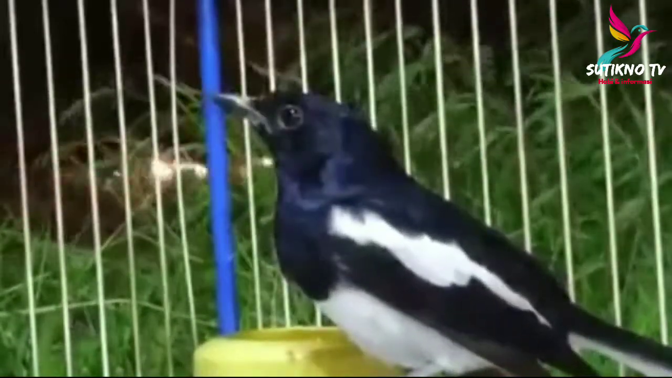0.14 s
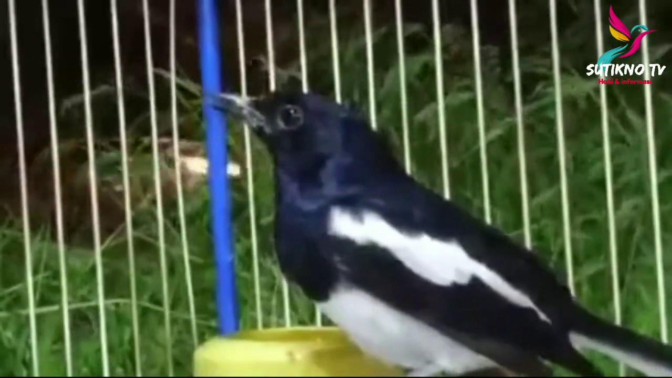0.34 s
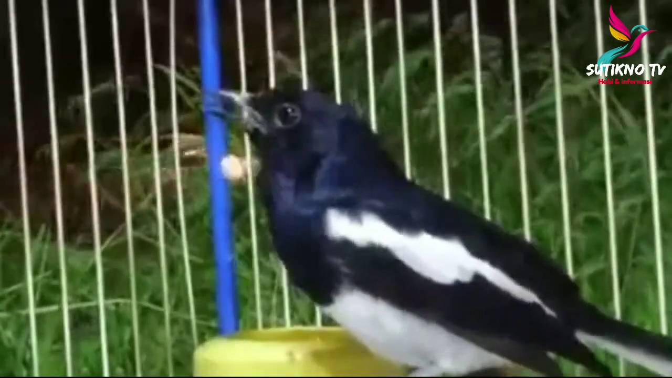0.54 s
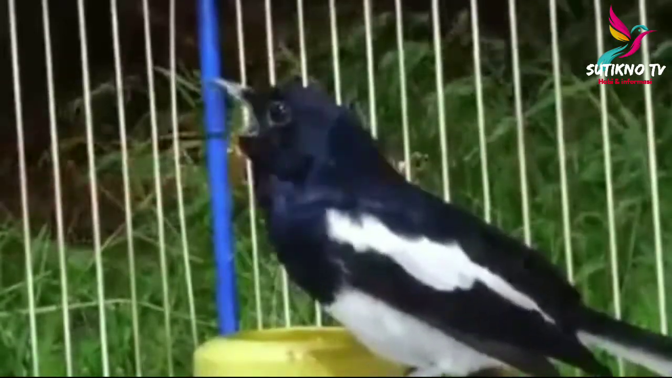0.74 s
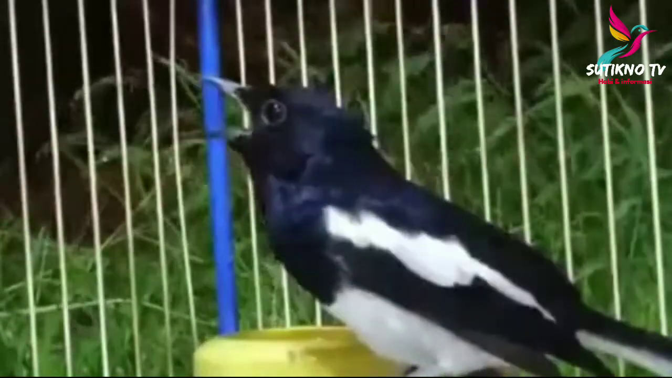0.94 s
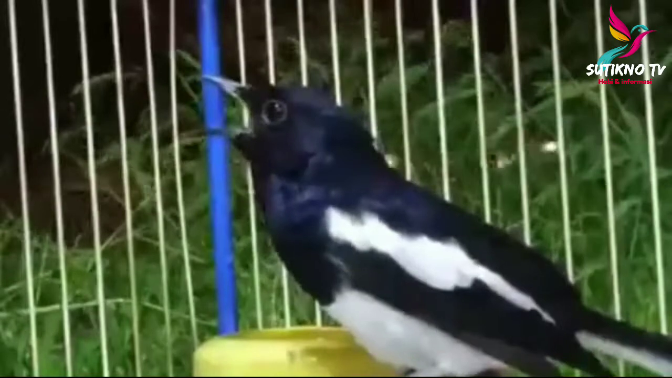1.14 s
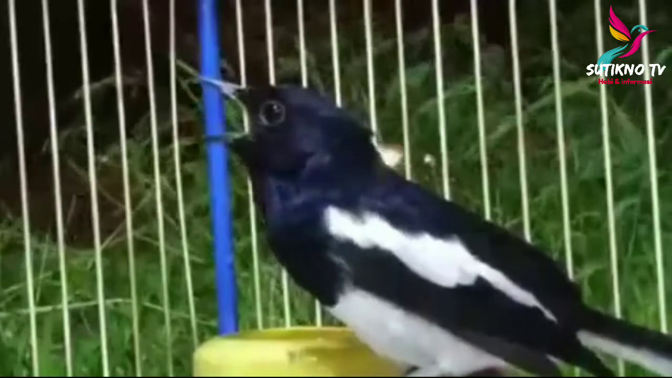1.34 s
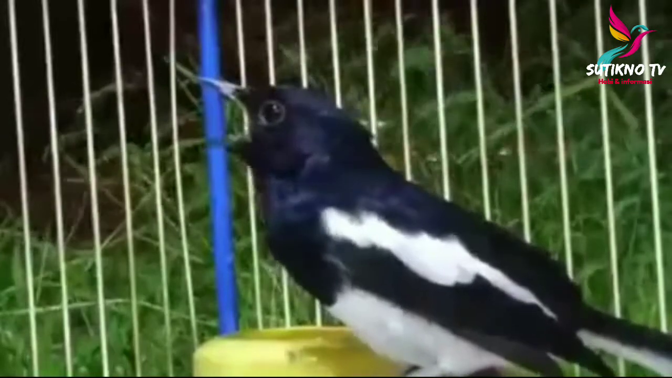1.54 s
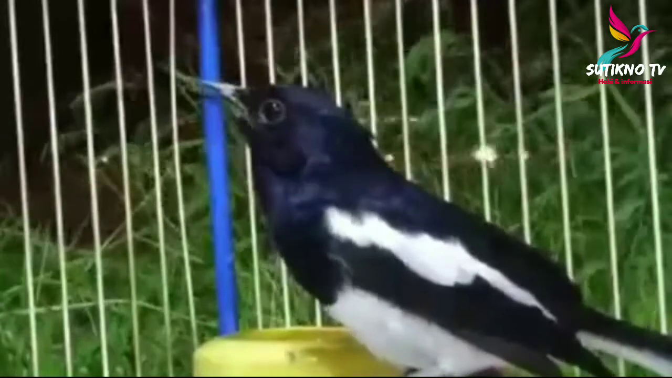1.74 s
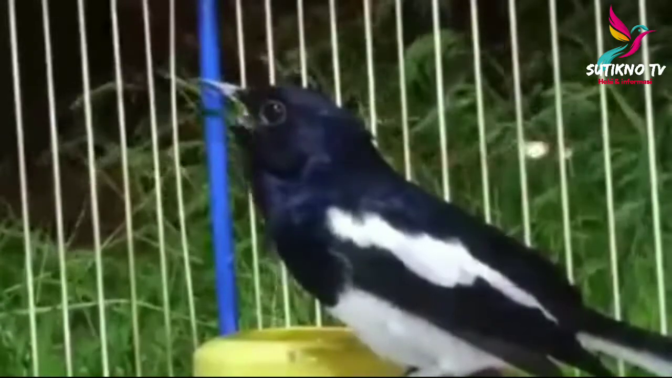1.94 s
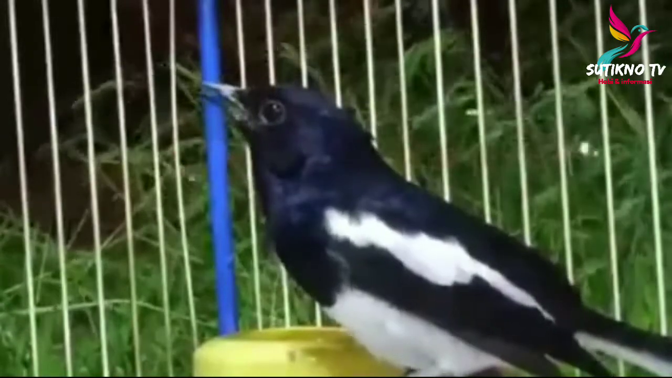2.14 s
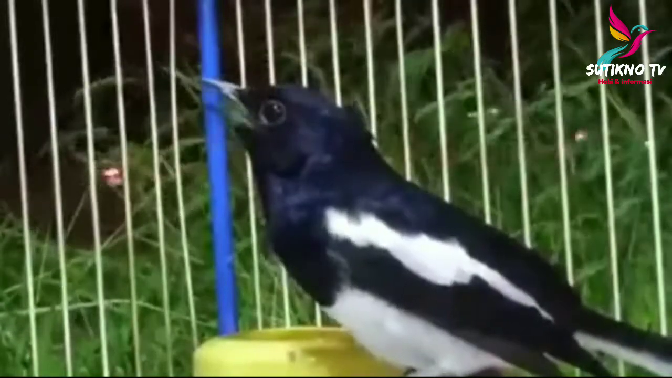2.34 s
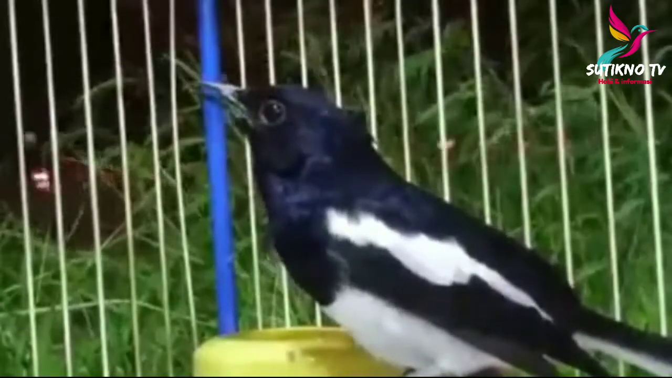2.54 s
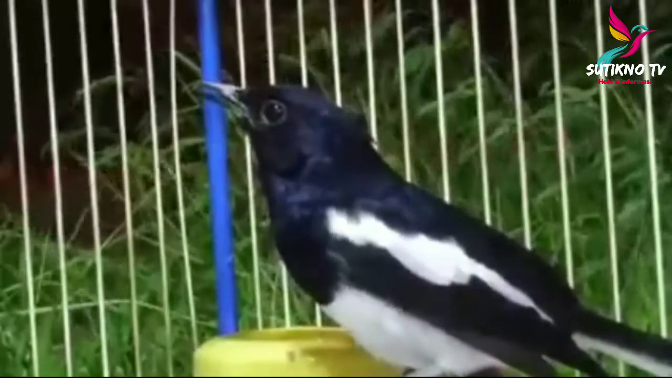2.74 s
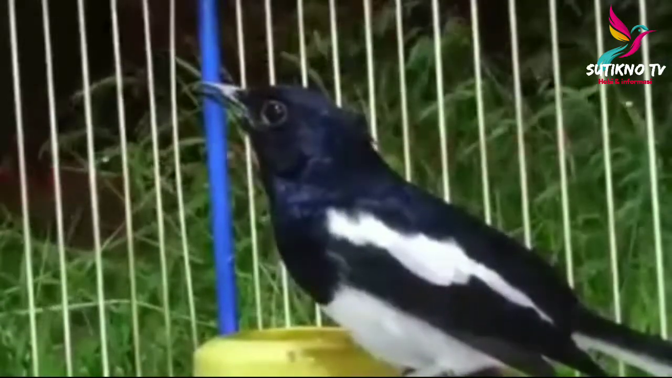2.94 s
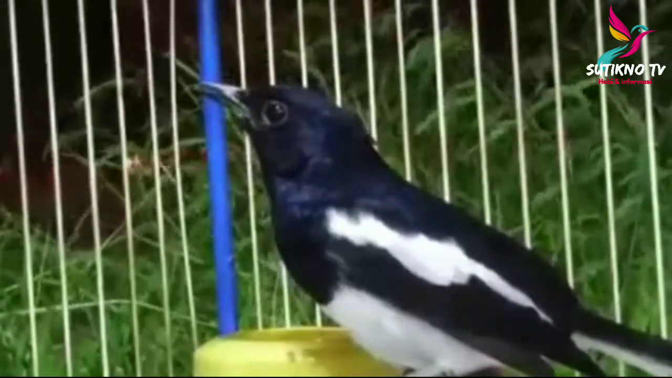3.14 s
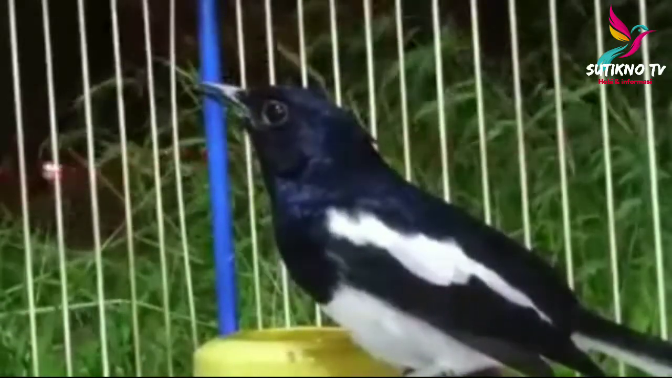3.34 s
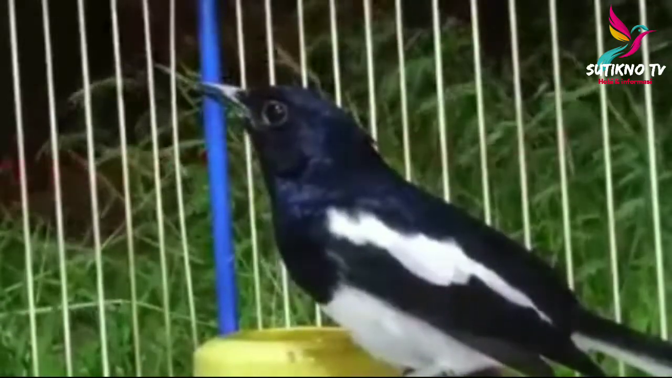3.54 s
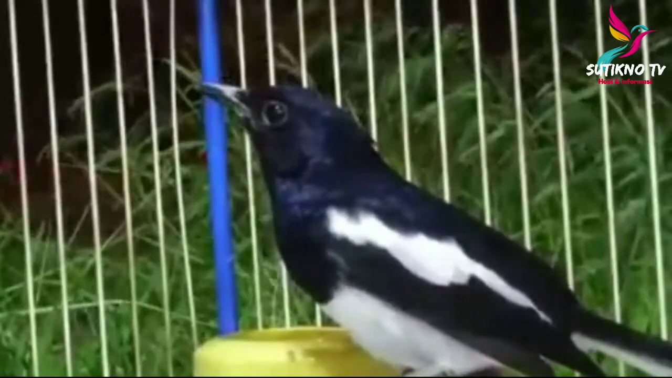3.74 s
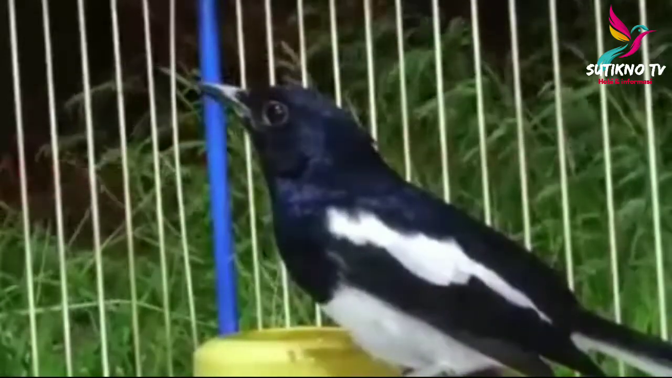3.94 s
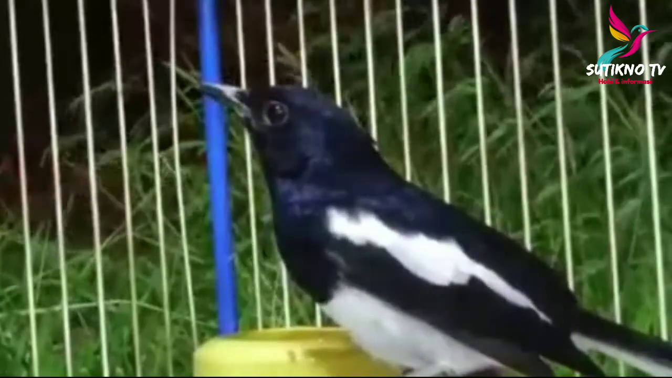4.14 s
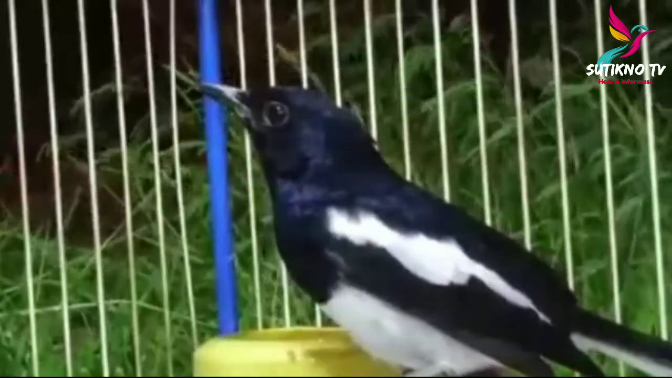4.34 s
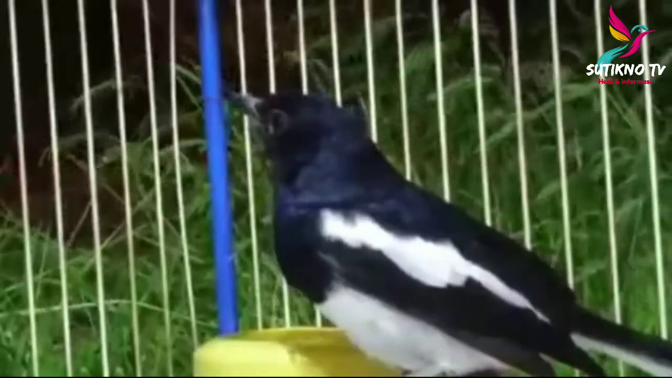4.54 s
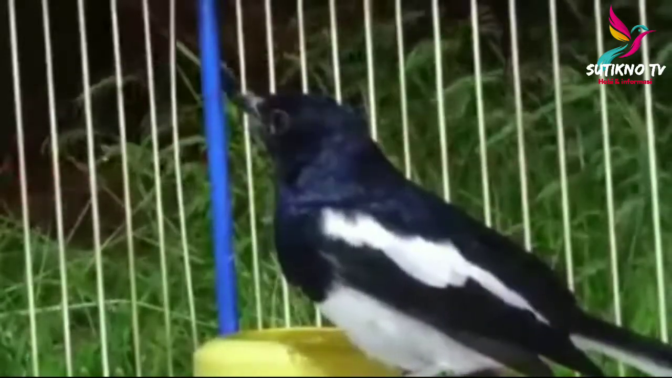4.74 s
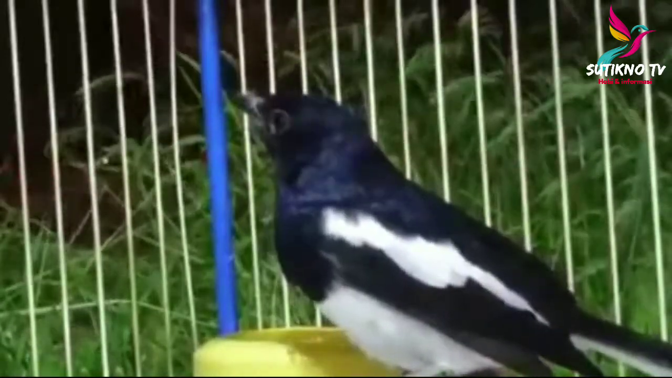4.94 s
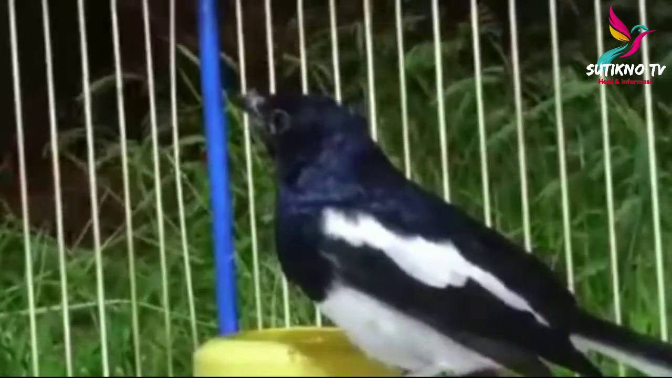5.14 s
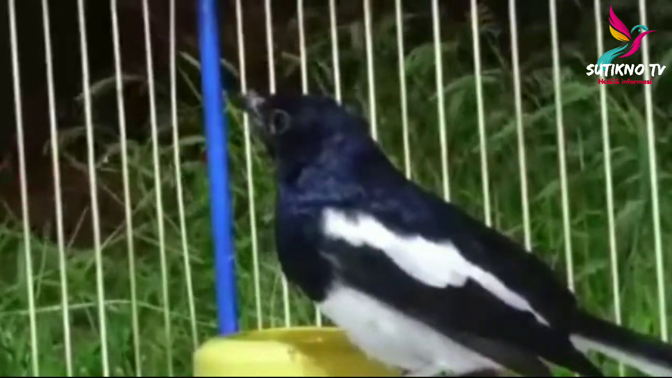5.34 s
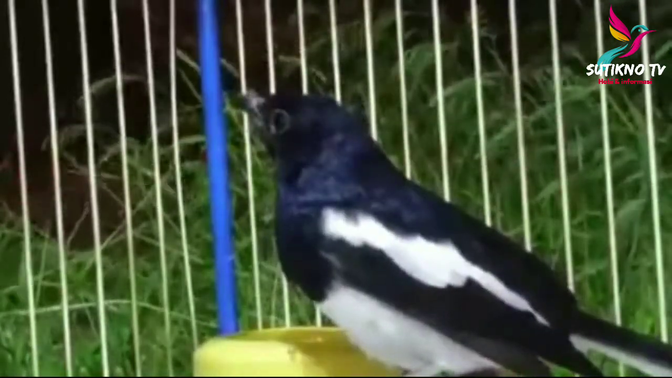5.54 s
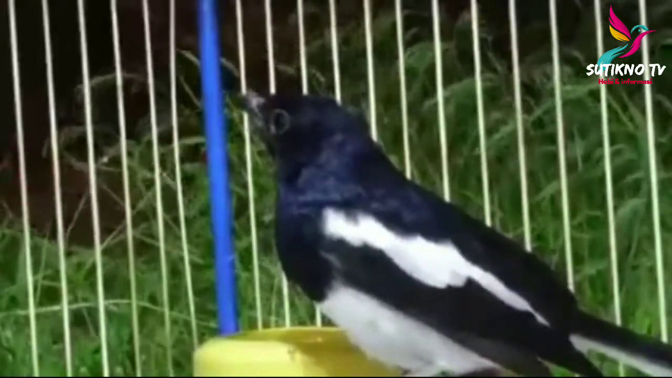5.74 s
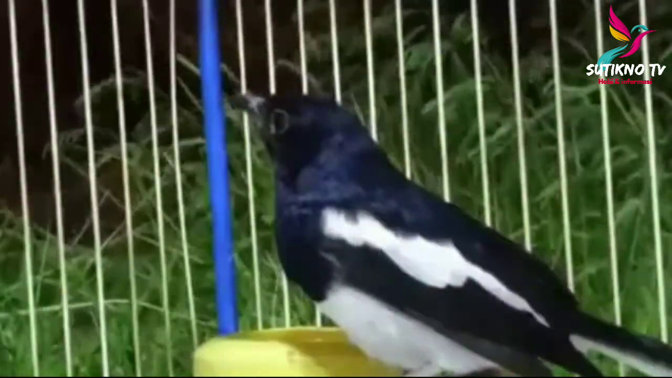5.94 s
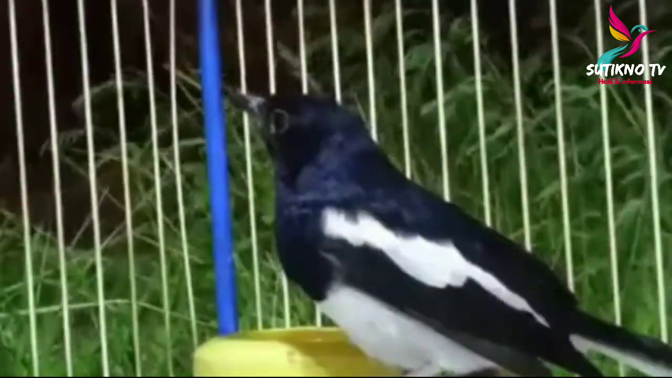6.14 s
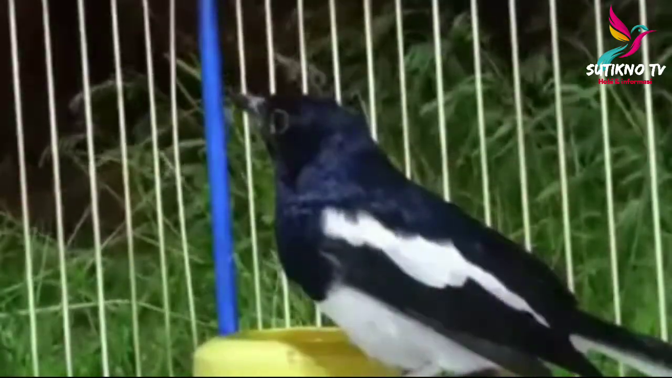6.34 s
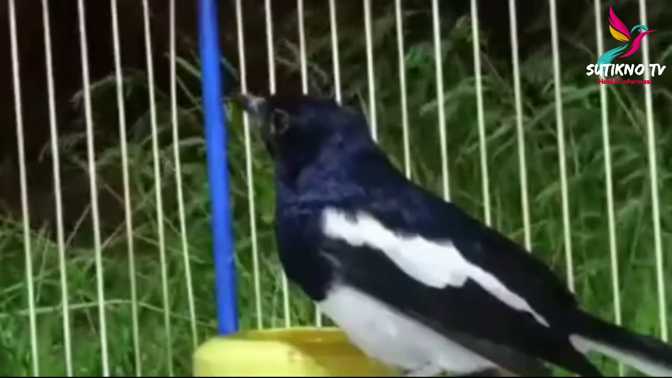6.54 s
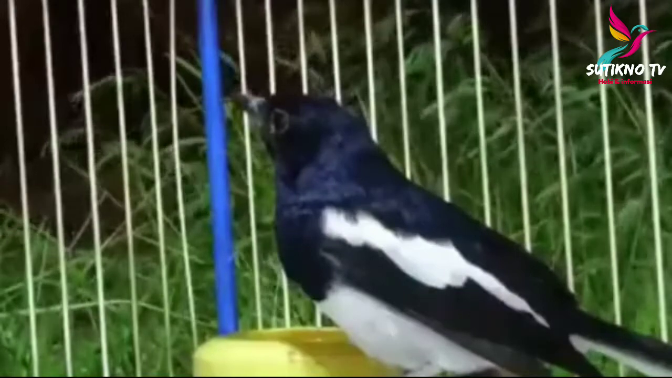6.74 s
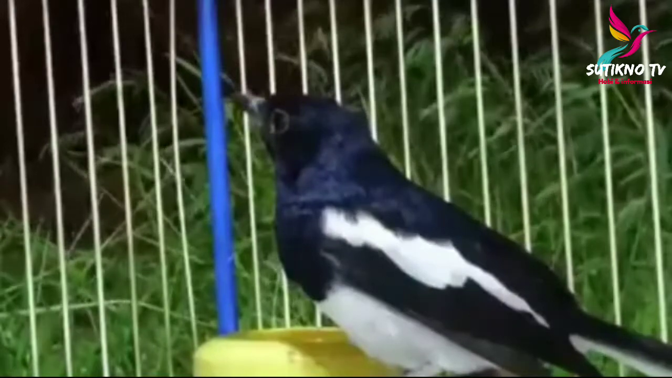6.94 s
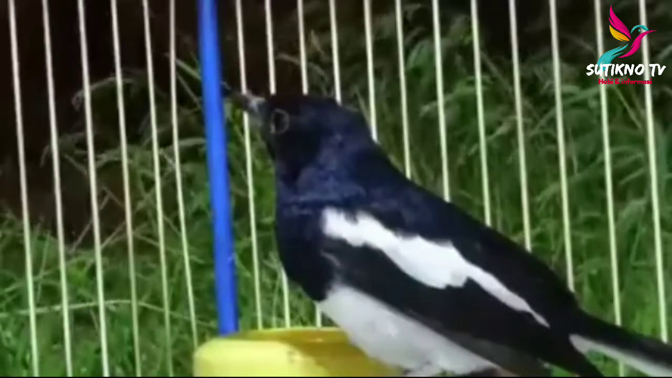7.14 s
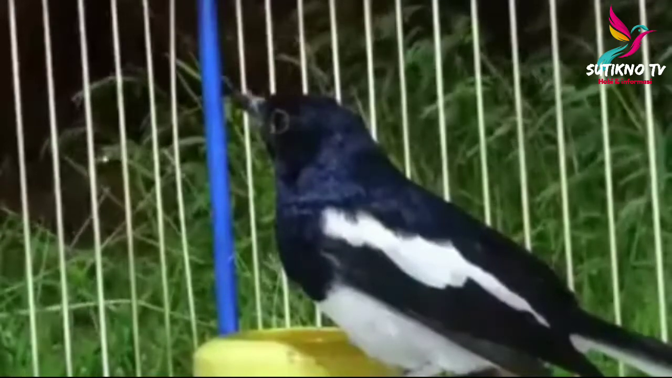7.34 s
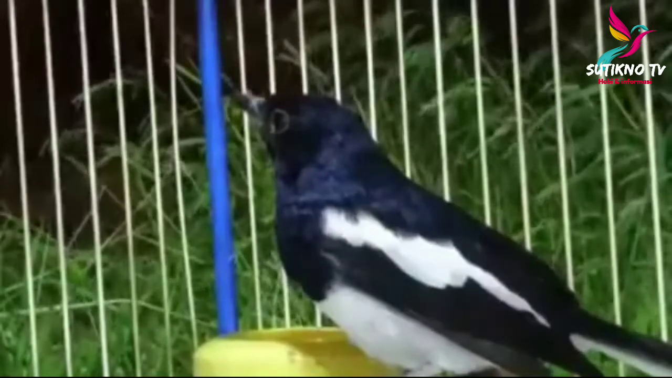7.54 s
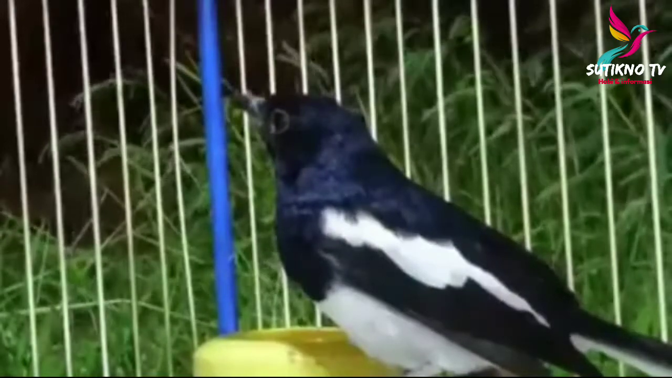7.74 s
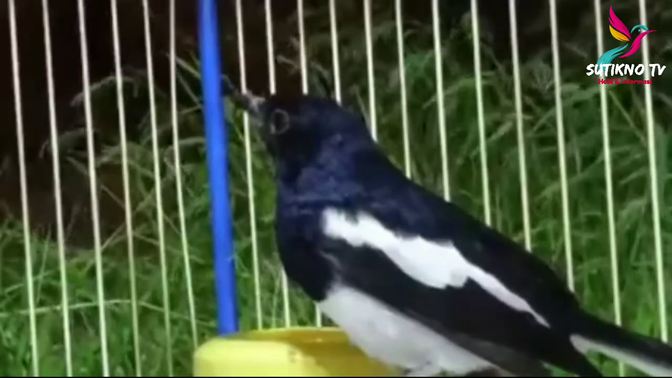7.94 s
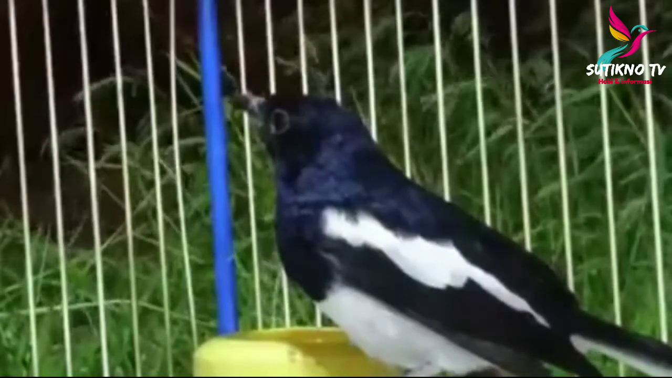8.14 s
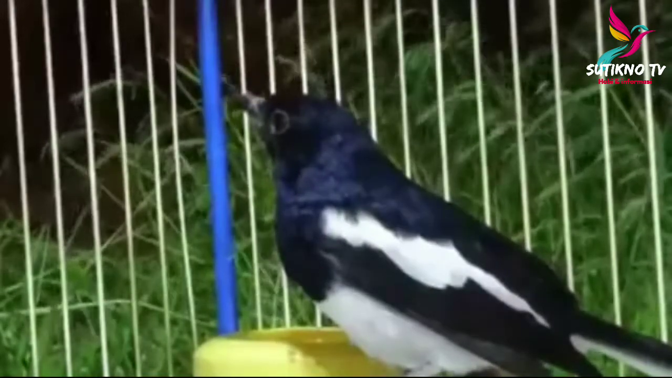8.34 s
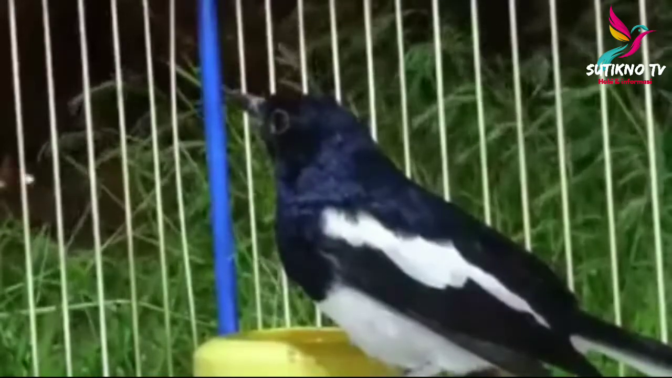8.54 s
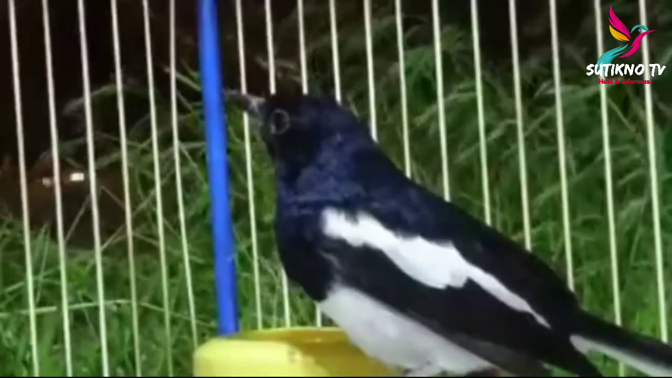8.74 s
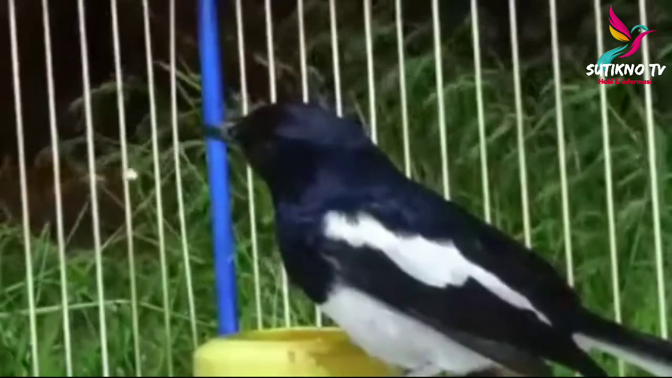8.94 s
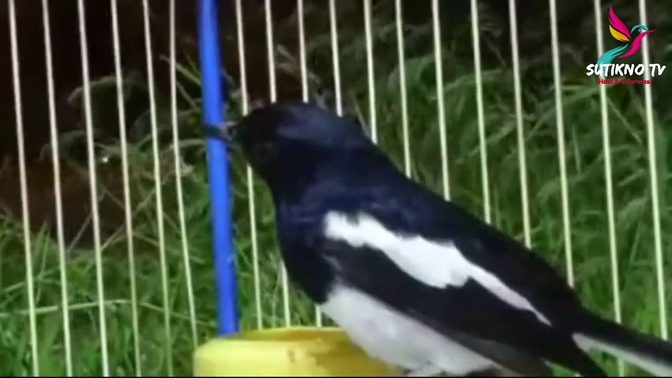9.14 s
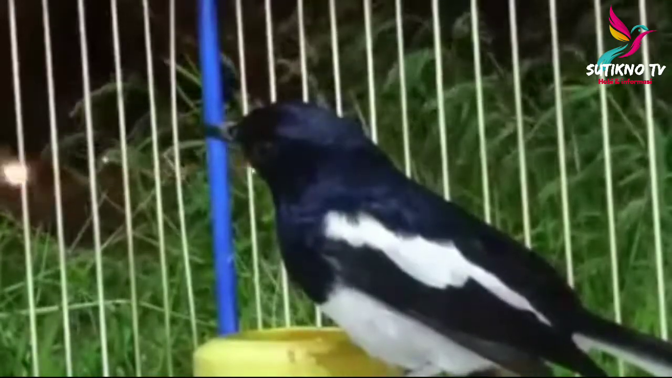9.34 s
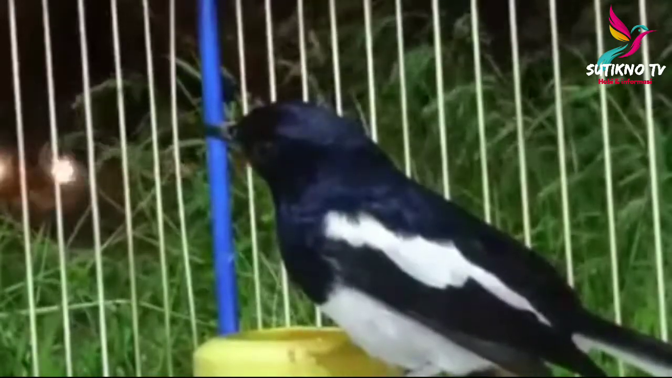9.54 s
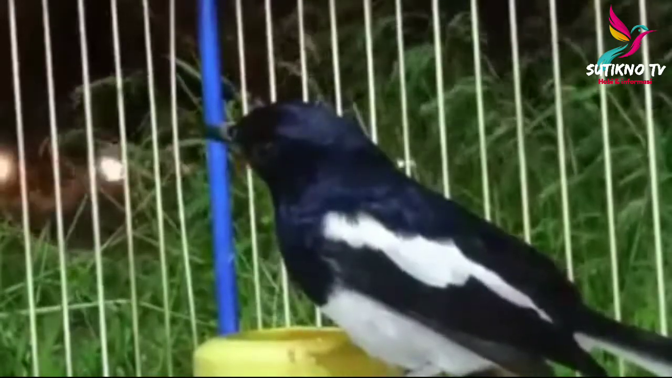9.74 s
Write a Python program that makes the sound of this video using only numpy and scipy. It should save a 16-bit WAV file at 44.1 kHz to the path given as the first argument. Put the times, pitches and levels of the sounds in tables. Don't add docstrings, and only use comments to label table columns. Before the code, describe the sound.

Bright, piercing bird whistles burst out early, giving way to quieter chirps, buzzes and sliding calls, with faint traffic rumble and a puttering motor late on.

```python
import sys
import numpy as np
from scipy import signal
from scipy.fft import rfft, irfft
from scipy.io import wavfile

SR = 44100
rng = np.random.default_rng(int(sys.argv[2]) if len(sys.argv) > 2 else 0)


def linear_from_db(decibels):
    return 10 ** (np.asarray(decibels, float) / 20)


def wav_out(sig):
    wavfile.write(sys.argv[1], SR, np.round(np.clip(np.atleast_2d(sig).T, -1, 1) * 32767).astype(np.int16))


N = 432180
TIME = np.arange(N) / SR

# [share of length/0-1, share of glide/0-1, level/dB]
RISE = [(0, 0, -22), (.15, 0.2, -11), (.45, 0.68, 1), (.8, 1.0, -6.5), (1, 0.64, -22)]
RAMP = [(0, 0.1, -13), (0.199, 0.17, -7), (.8, .8, 0), (1, 1, -7)]
DIP = [(0, 0, -9), (.2, 0.6, -1), (.4, 0.93, -7.5), (.6, 0.93, 0), (.85, .1, -3.5), (1, 0, -16)]
HOOK = [(0, 0.46, -3), (.22, 0.017, -9.5), (.5, .5, -1), (1, 0.96, -16.5)]
FALL = [(0, 0.024, 3.5), (.12, 0.25, 1), (.45, .6, 1), (1, 1, -12.5)]
ARCH = [(0, 0.082, -6.5), (.28, 0.72, 1.5), (.65, 0.96, -6.5), (1, 0.73, -14.5)]
LEVEL = [(0, 0.12, -2), (.15, 0.2, 1.5), (.8, 0.71, 1), (1, 0.9, -8.5)]
STRUCK = [(0, 0, -2), (.25, .4, -6), (1, 0.9, -18)]
DROP = [(0, 0.018, -18), (.1, .78, -11), (.2, 0.94, 0.5), (.33, 1, -3.5), (1, 1, -31)]
SWEEP = [(0, 0.067, -3.5), (.6, .55, -1), (1, 1, -2)]
SLIDE = [(0, 0.048, -2), (0.128, 0.067, 4.5), (0.339, .62, -3.5), (0.48, .88, -3.5), (1, 0.98, -13.5)]
SCOOP = [(0, 0.039, -1), (.5, .22, -0.5), (1, 1, 6)]
DIVE = [(0, 0.021, -18), (1.001, 0.94, -1.5)]
BOW = [(0, 0.15, -9.5), (.25, .85, -1.5), (.5, 0.98, 0), (.8, .93, 2.5), (1, 0.68, -7)]
LADLE = [(0, .2, -1), (.12, .3, 4.5), (.35, 0, -7), (.65, 0.31, -7), (.9, 1, 2.5), (1, 0.68, -4)]
RATTLE = [(0, 0.014, -23), (0.072, 0.066, -8.5), (.25, .8, 5), (.38, .15, -5), (.53, 0.99, -1),
          (.66, .05, -4), (.8, 0.94, -21), (1, 0.074, -15)]
ROUND = [(0, 0.068, -12), (.12, .55, -2), (.35, .93, 1.5), (0.86, 0.97, -1), (1, 0.073, -17.5)]
CROOK = [(0, 0.089, -1), (.15, .8, 3), (.3, 0.9, 1), (.6, .85, -6), (1, 0.33, -8)]
SAG = [(0, .1, -5.5), (.1, 0.078, -0.5), (.45, 0.93, -1), (.8, 0.96, -12), (1, .9, -9.5)]
FADE = [(0, 0, 0.5), (.12, 0, 2.5), (.55, .35, -9), (1, 1, -16.5)]

# [f/Hz, level/dB]
BEAK = [(4000, -4.5), (5500, -1), (6800, 5.5), (8600, -2.5), (15000, -6)]
NEAR_OVERTONES_DB = [-20, -24.5, -46.5, -38]
SAG_OVERTONES_DB = [-3.5, -19]
DIP_OVERTONES_DB = [-13, -30]
HOOK_OVERTONES_DB = [-36.5]
WARBLE_OVERTONES_DB = [-2, -21, -22, -27]
FAR_OVERTONES_DB = [-38.5, -35.5]

# [t/s, mean f/Hz, level/dB, trill swing/Hz]
WARBLE = [
    [(.95, 2300, -39, -2), (.975, 2500, -35, 8.5), (.995, 2667, -20, 120), (1.11, 2536, -19.5, 95),
     (1.125, 2473, -20.5, 0), (1.21, 2678, -18, -5.5), (1.228, 2230, -27.5, 19)],
]
# [start t/s, end t/s, from f/Hz, to f/Hz, peak level/dB]
NEAR_RISES = [(.505, .57, 1745, 2026, -14), (.64, .738, 2226, 2850, -6.5), (1.466, 1.485, 2990, 3450, -4.5),
              (2.058, 2.078, 2810, 3270, -11.5)]
NEAR_RAMPS = [(1.325, 1.378, 4070, 4575, -2), (1.587, 1.63, 4180, 4670, -4.5),
              (1.903, 1.958, 4170, 4680, -2.5), (1.63, 1.668, 4820, 5310, -3.5),
              (2.265, 2.277, 3395, 4100, -18)]
NEAR_DIPS = [(1.66, 1.716, 3844, 3326, -6), (1.965, 2.016, 3690, 3322, -5)]
NEAR_HOOKS = [(1.768, 1.812, 2850, 1740, -3), (2.074, 2.11, 2800, 2040, -4.5)]
NEAR_FALLS = [(1.41, 1.462, 4910, 4260, -16), (1.482, 1.492, 2870, 1900, -17),
              (1.712, 1.721, 3690, 2707, -19), (1.885, 1.903, 3580, 2720, -22),
              (1.757, 1.77, 3470, 3600, -8.5), (1.958, 1.982, 4710, 5380, -12)]
NEAR_ROUNDS = [(.802, .888, 3040, 3552, -2.5)]
NEAR_SAGS = [(1.395, 1.468, 3536, 2985, -14.5)]
NEAR_CRESTS = [(1.376, 1.414, 4800, 5220, -8)]
NEAR_FADES = [(2.275, 2.395, 4120, 3735, -12)]

# [start t/s, end t/s, from mean f/Hz, to mean f/Hz, peak level/dB]
YODELS = [
    (4.579, 4.745, 1780, 2300, -33.5),
    (4.546, 4.724, 1820, 3130, -28),
]
# [start t/s, end t/s, from f/Hz, to f/Hz, peak level/dB]
BOWED = [(4.335, 4.57, 2900, 3710, -18.5)]
# [start t/s, lowest f/Hz, peak level/dB]
CHATTER = [
    (9.386, 2800, -23.5),
    (9.528, 2530, -26.5),
    (9.665, 2530, -26),
]
CHATTER_S, CHATTER_FROM_HZ = 0.09, 3550
RASP_FROM_HZ, RASP_TO_HZ, RASP_DB = 4260, 5250, -22.5

# [start t/s, end t/s, from f/Hz, to f/Hz, peak level/dB]
FAR_ARCHES = [(.45, .61, 3470, 3867, -18), (.53, .6, 2500, 2890, -27.5), (2.54, 2.575, 3132, 3150, -24),
              (5.7, 5.83, 2750, 3210, -20.5), (5.895, 6.0, 2910, 3153, -23.5),
              (6.035, 6.13, 2970, 3030, -25), (6.42, 6.49, 3500, 3950, -36.5),
              (6.955, 7.085, 2440, 2598, -23), (7.03, 7.18, 2930, 2980, -33.5),
              (7.2, 7.39, 2750, 3150, -25.5), (7.55, 7.67, 2260, 2634, -25.5),
              (7.915, 8.02, 2830, 3250, -20.5), (.125, .24, 2400, 2840, -26.5),
              (.255, .34, 2480, 2840, -27.5), (3.79, 3.87, 1276, 1400, -30)]
FAR_LEVELS = [(0.03, .365, 3270, 3110, -20), (0.15, .26, 2510, 2360, -28.5), (.68, 0.9, 3420, 3000, -23),
              (0.865, .99, 2940, 2780, -30.5), (1.78, 1.92, 1710, 1670, -38.5),
              (2.98, 3.08, 3100, 2090, -35), (2.94, 3.09, 1850, 1900, -35.5),
              (7.77, 7.9, 2130, 1900, -44.5), (3.14, 3.17, 4120, 5100, -51), (3.52, 3.615, 1950, 1900, -39),
              (5.78, 5.88, 2510, 2200, -27), (6.25, 6.37, 2200, 2500, -38), (6.72, 6.87, 2380, 2300, -34.5),
              (6.7, 6.83, 1780, 1900, -37.5), (.595, .66, 2860, 2550, -29.5), (6.25, 6.46, 1810, 1860, -42),
              (3.37, 3.56, 2300, 2100, -42.5), (3.262, 3.295, 2540, 2400, -25.5),
              (7.822, 7.94, 2460, 2250, -41), (2.5, 2.673, 1387, 1375, -45.5),
             (2.945, 3.015, 1250, 1280, -42), (3.037, 3.077, 1326, 1320, -40),
             (3.192, 3.305, 1353, 1361, -38), (4.273, 4.458, 4100, 4060, -42.5)]
FAR_STRUCK = [(0.0, 0.078, 2456, 2303, -14.5), (.612, .7, 3770, 3460, -14), (1.21, 1.35, 2963, 3090, -18.5),
              (3.955, 4.29, 1530, 1403, -26), (4.73, 4.98, 1510, 1401, -24.5),
              (5.672, 5.725, 3620, 3600, -22.5), (5.665, 5.8, 1400, 1420, -34),
              (5.97, 6.07, 2030, 1990, -21), (6.295, 6.39, 3170, 3100, -28.5), (5.5, 5.54, 1510, 1500, -29),
              (6.55, 6.65, 2130, 1500, -27.5), (7.55, 7.58, 1200, 1084, -26),
              (2.195, 2.21, 3150, 3100, -13.5), (2.84, 2.9, 2170, 1500, -22.5),
              (2.61, 2.635, 2495, 1850, -17.5)]
FAR_DROPS = [(6.48, 6.62, 3900, 2994, -21), (6.812, 7.0, 5220, 3020, -20)]
FAR_SWEEPS = [(2.478, 2.545, 1950, 3150, -26.5), (1.335, 1.45, 2350, 1600, -32),
              (1.955, 1.99, 2700, 2400, -24), (3.292, 3.328, 2700, 3800, -33),
              (5.2, 5.235, 1600, 2400, -17), (6.35, 6.43, 1950, 2800, -27), (6.43, 6.49, 2500, 2850, -36),
              (7.17, 7.25, 2100, 2720, -29.5), (7.4, 7.53, 2760, 2380, -28.5),
              (3.635, 3.69, 3600, 1800, -29.5), (.465, .485, 4100, 5000, -26)]
FAR_SLIDES = [(3.6, 3.79, 2160, 1303, -30.5), (4.345, 4.66, 2317, 1152, -29),
              (5.14, 5.36, 2350, 1194, -28.5)]
FAR_LADLES = [(9.243, 9.333, 1766, 3040, -24)]
FAR_CROOKS = [(5.335, 5.42, 1753, 2613, -25)]
FAR_RAMPS = [(7.27, 7.455, 3280, 3625, -24)]
# [start t/s, end t/s, from mean f/Hz, to mean f/Hz, peak level/dB]
ZIGZAGS = [(2.21, 2.255, 2700, 2350, -25), (2.275, 2.38, 2400, 2450, -29), (9.327, 9.385, 2600, 2950, -39),
           (9.243, 9.31, 3400, 3250, -30.5), ]
# [start t/s, end t/s, from mean
# f/Hz, to mean f/Hz, peak level/dB]
WAVERS = [(3.14, 3.22, 3050, 3150, -46), (3.23, 3.27, 1870, 2110, -34), (2.76, 2.81, 2300, 2500, -39),
          (3.33, 3.4, 3050, 2930, -55), (6.67, 6.76, 4450, 3700, -49), (6.59, 6.7, 2100, 2300, -30.5),
          (6.9, 6.96, 1840, 2120, -37), (7.05, 7.13, 2080, 2110, -35), (7.18, 7.25, 2100, 2300, -40),
          (7.43, 7.49, 1872, 1555, -41), (7.44, 7.52, 3055, 3000, -36.5), (7.5, 7.56, 2330, 1930, -31.5),
          (7.56, 7.65, 3380, 2750, -32.5), (7.575, 7.63, 3650, 3450, -43), (7.67, 7.75, 1724, 1950, -38.5),
          (7.71, 7.8, 4560, 3030, -47), (7.69, 7.76, 3450, 3200, -46), (7.845, 7.88, 2900, 3200, -44),
          (7.88, 7.96, 1800, 1700, -39.5), (8.06, 8.18, 2800, 2500, -37.5),
          (8.375, 8.52, 2670, 2360, -32.5), (8.8, 8.94, 2680, 2370, -33.5), (8.2, 8.27, 1908, 1940, -47),
          (8.2, 8.3, 3200, 3150, -49), (8.55, 8.63, 2450, 2300, -54), (4.2, 4.23, 3100, 2870, -43),
          (4.21, 4.34, 4600, 4500, -48.5), (4.35, 4.43, 2980, 3100, -34), (1.04, 1.12, 1800, 1700, -38.5),
          (9.4, 9.49, 3100, 3060, -32.5), (9.54, 9.63, 3294, 3100, -36), (9.68, 9.77, 3240, 3250, -35),
          (9.25, 9.31, 3486, 3000, -31),
          (4.75, 5.03, 3000, 3120, -31.5), (4.78, 4.93, 3620, 3560, -35.5), (4.74, 5.0, 2720, 2500, -35),
           (5.05, 5.1, 2800, 2900, -40.5), (5.1, 5.145, 1900, 1770, -39.5), (5.17, 5.2, 2300, 2600, -32),
           (5.21, 5.28, 3100, 3100, -46.5), (5.24, 5.3, 2400, 2400, -42), (5.3, 5.34, 3000, 1500, -40),
           (5.4, 5.47, 1600, 2800, -43), (5.25, 5.33, 4600, 3800, -50), (5.665, 5.72, 1780, 1600, -42),
           (5.655, 5.69, 3000, 3200, -32.5), (5.84, 5.96, 2300, 2500, -31), (6.09, 6.17, 2100, 1850, -41),
           (6.235, 6.4, 3150, 2700, -42), (6.25, 6.32, 2900, 4000, -51), (5.74, 5.84, 2600, 3200, -42),
           (3.39, 3.53, 3820, 3780, -47), (3.53, 3.62, 2500, 2300, -37.5), (3.7, 3.84, 2750, 2800, -45.5),
           (3.91, 3.94, 3150, 2900, -51), (3.97, 4.1, 3000, 3200, -47), (3.63, 3.73, 3500, 3450, -40),
           (3.44, 3.56, 3000, 3150, -37.5), (3.6, 3.64, 3800, 3700, -36), (.88, .99, 3500, 4000, -41),
           (0.53, .56, 2800, 3400, -33), (0.77, 0.83, 2500, 2600, -34), (2.5, 2.6, 2200, 2600, -55),
           (2.98, 3.07, 3700, 2000, -45), (3.61, 3.66, 3250, 2300, -42), (5.52, 5.56, 3400, 2700, -33.5)]
# [start t/s, end t/s, from mean f/Hz, to mean f/Hz, peak level/dB]
PURRS = [(2.87, 3.08, 3010, 3110, -34.5)]
# [start t/s, end t/s, mean f/Hz, level/dB]
BUZZ = [ (5.89, 6.07, 2465, -34),
        (.478, 0.5, 4500, -29),
    (9.24, 9.325, 5030, -42.5),
    (2.112, 2.1602, 2300, -24),
]
# [start t/s, peak level/dB]
SCOOPS = [(2.629, -28.5), (2.775, -31.5), (2.915, -30.5), (3.082, -31)]
SCOOP_S, SCOOP_FROM_HZ, SCOOP_TO_HZ = 0.056, 1850, 2750
PACING = [2.395, 2.479, 2.626, 2.774, 3.083, 3.239]
PACING_S, PACING_HZ, PACING_DB = 0.025, 3150, -27.5
# [start t/s, length/s, end f/Hz, peak level/dB]
DIVES = [
    (7.996, 0.054, 3000, -14.5),
    (8.281, 0.052, 2760, -12.5),
    (8.728, .054, 2820, -13),
]
DIVE_FROM_HZ = 4250
DIVE_BUZZ_S, DIVE_BUZZ_HZ, DIVE_BUZZ_DB = 0.126, 3180, -15

# [t/s, length/s, level/dB]
RUSTLES = [
    (4.68, .05, -37),
    (6.92, .04, -47),
    (2.77, .04, -46),
]
# [f/Hz, level/dB, t60/s]
WOOD = [(635, 5.5, 0.0071), (780, -4.5, 0.039), (1202, -19, 0.031)]
# [t/s, firings per s, level/dB]
ENGINE = [
    (5.8, 30, -39),
    (7.25, 34.4, -31.5),
    (8.14, 33.2, -38),
    (9.0, 29.2, -32),
    (9.8, 27, -28.5),
]
# [low f/Hz, high f/Hz, level/dB]
EXHAUST = [(324, 613, 1), (894, 1230, -10)]
# [start t/s, end t/s, f/Hz, level/dB]
DRONE = [
    (0.029, 0.23, 330, -31.5),
    (0.0085, 0.32, 640, -34.5),
]
# [t/s, rumble level/dB, leaf hiss level/dB]
STREET = [(0.0, -20.5, -49), (1.5, -20.5, -47), (3.0, -22, -51), (4.2, -24, -54), (4.6, -24.5, -52),
          (5.6, -25, -57.5), (6.8, -24, -57), (7.8, -27.5, -56.5), (8.51, -26, -59.5), (9.8, -24.5, -55)]
# [f/Hz, level/dB]
RUMBLE = [(15, -50), (40, -18), (80, -4), (148, 2.5), (224, -6.5), (695, -20.5), (1770, -29), (3040, -28),
          (3470, -41), (4500, -70.5), (5850, -82), (9900, -120)]
# [f/Hz, level/dB]
HISS = [(2350, -27), (4000, -8.5), (4790, -11.5), (7160, -9.5), (8570, -21.5), (12600, -25.5), (15400, -17)]
# [t/s, length/s, level/dB]
GUSTS = [(.79, 0.054, -18), (2.05, 0.097, -32), (3.8, 0.14, -32), (5.9, 0.072, -27.5), (8.8, 0.041, -26),
         (1.27, 0.096, -20.5), (6.35, 0.2, -28)]


def rms_one(x):
    return x / np.sqrt(np.mean(x ** 2) + 1e-20)


def in_time(rows, t):
    s, *columns = np.transpose(rows)
    return [np.interp(t, s, column) for column in columns]


def drift(rate, count=N):
    r = np.exp(-2 * np.pi * rate / SR)
    noise = rng.standard_normal(count + 4000)
    return rms_one(signal.lfilter([1], [1, -2 * r, r * r], noise)[4000:])


def band(x, low_hz, high_hz, order):
    return signal.sosfilt(signal.butter(order, [low_hz, high_hz], "band", fs=SR, output="sos"), x)


def coloured(spectrum):
    hz, db = np.transpose(spectrum)
    grid = np.arange(1, N // 2 + 2) * SR / N
    gain = linear_from_db(np.interp(np.log(grid), np.log(hz), db))
    return rms_one(irfft(rfft(rng.standard_normal(N)) * gain, N))


def bumps(rows):
    return sum(linear_from_db(db) * np.exp(-((TIME - s) / length) ** 2) for s, length, db in rows)


def shaped(rows, shape):
    return [[(start + at * (end - start), hz + share * (to_hz - hz), db + d) for at, share, d in shape]
            for start, end, hz, to_hz, db in rows]


def held(rows):
    return [[(start, hz, db), (end, hz, db)] for start, end, hz, db in rows]


def sing(notes, overtones_db, trill_per_s, swing_hz, unsteady_hz, flutter_db, fade_s, sharp=2, uneven=0.172):
    out = np.zeros(N)
    for note in notes:
        first = max(int((note[0][0] - fade_s) * SR), 0)
        last = min(int((note[-1][0] + fade_s) * SR), N)
        span = np.arange(first, last)
        t = span / SR
        hz, db, *swing = in_time(note, t)
        beat = np.cumsum(trill_per_s * (1 + uneven * drift(31.3, count=len(t)))) / SR
        trill = 1 - 2 * np.abs(np.sin(np.pi * beat)) ** sharp
        hz = hz + (swing[0] if swing else swing_hz) * trill + unsteady_hz * drift(90, count=len(t))
        phase = 2 * np.pi * (np.cumsum(hz) / SR + rng.random())
        wave = np.sin(phase)
        for k, overtone_db in enumerate(overtones_db, start=2):
            beak_db = in_time(BEAK, k * hz)[0]
            wave = wave + linear_from_db(overtone_db + beak_db) * np.sin(k * phase) * (k * hz < SR / 2)
        edge = np.clip(np.minimum(t - t[0], t[-1] - t) / (2 * abs(fade_s)), 0, 1) ** 2
        loudness = linear_from_db(db + flutter_db * drift(85, count=len(t)))
        out[span] += np.sqrt(2) * loudness * edge * wave
    return out


def near_notes():
    plain = (shaped(NEAR_RISES, RISE) + shaped(NEAR_RAMPS, RAMP) + shaped(NEAR_ROUNDS, ROUND)
             + shaped(NEAR_CRESTS, ARCH) + shaped(NEAR_FADES, FADE))
    return [(plain, NEAR_OVERTONES_DB),
            (shaped(NEAR_SAGS, SAG), SAG_OVERTONES_DB),
            (shaped(NEAR_DIPS, DIP), DIP_OVERTONES_DB),
            (shaped(NEAR_HOOKS, HOOK) + shaped(NEAR_FALLS, FALL), HOOK_OVERTONES_DB)]


def near_bird():
    whistles = sum(sing(notes, overtones_db, trill_per_s=0, swing_hz=0, unsteady_hz=18, flutter_db=1.0,
                        fade_s=0.002)
                   for notes, overtones_db in near_notes())
    warble = sing(WARBLE, WARBLE_OVERTONES_DB, trill_per_s=53.0, swing_hz=0, unsteady_hz=19, flutter_db=1.0,
                  fade_s=0.002, sharp=1.0, uneven=0.0075)
    sum_tones = signal.sosfilt(signal.butter(6, 6800, "high", fs=SR, output="sos"), whistles ** 2)
    return whistles + warble + linear_from_db(-18) * sum_tones


def close_voices():
    rocking = sing(shaped(YODELS, LEVEL), FAR_OVERTONES_DB, trill_per_s=29.7, swing_hz=230, unsteady_hz=40,
                   flutter_db=3.5, fade_s=0.006, sharp=1.4, uneven=0.02)
    chatter = [(s, s + CHATTER_S, CHATTER_FROM_HZ, hz, db) for s, hz, db in CHATTER]
    gliding = sing(shaped(BOWED, BOW) + shaped(chatter, RATTLE), FAR_OVERTONES_DB, trill_per_s=0, swing_hz=0,
                   unsteady_hz=40, flutter_db=2.2, fade_s=0.0033)
    return rocking + gliding


def far_notes():
    scoops = [(s, s + SCOOP_S, SCOOP_FROM_HZ, SCOOP_TO_HZ, db) for s, db in SCOOPS]
    dives = [(s, s + length, DIVE_FROM_HZ, hz, db) for s, length, hz, db in DIVES]
    return (shaped(FAR_ARCHES, ARCH) + shaped(FAR_LEVELS, LEVEL) + shaped(FAR_STRUCK, STRUCK)
            + shaped(FAR_DROPS, DROP) + shaped(FAR_SWEEPS, SWEEP) + shaped(dives, DIVE)
            + shaped(scoops, SCOOP) + shaped(FAR_SLIDES, SLIDE) + shaped(FAR_RAMPS, RAMP)
            + shaped(FAR_LADLES, LADLE) + shaped(FAR_CROOKS, CROOK))


def far_buzzes():
    trailing = [(s + length, s + length + DIVE_BUZZ_S, DIVE_BUZZ_HZ, db + DIVE_BUZZ_DB)
                for s, length, hz, db in DIVES]
    pacing = [(s, s + PACING_S, PACING_HZ, PACING_DB) for s in PACING]
    riding = [(s - 0.008, s + CHATTER_S, RASP_FROM_HZ, RASP_TO_HZ, db + RASP_DB) for s, hz, db in CHATTER]
    return held(BUZZ + trailing + pacing) + shaped(riding, CROOK)


def is_steady(note):
    start, end_hz = note[0][0], note[-1][1]
    return start < 0.6 or end_hz < 1500 or 2.93 < start < 3 or 6.69 < start < 6.8


def far_birds():
    notes = far_notes()
    steady = [note for note in notes if is_steady(note)]
    unsteady = [note for note in notes if not is_steady(note)]
    whistles = sing(steady, FAR_OVERTONES_DB, trill_per_s=0, swing_hz=0, unsteady_hz=7, flutter_db=1.0,
                    fade_s=0.0036)
    whistles += sing(unsteady, FAR_OVERTONES_DB, trill_per_s=0, swing_hz=0, unsteady_hz=32, flutter_db=3.0,
                     fade_s=0.0045)
    buzzes = sing(far_buzzes(), FAR_OVERTONES_DB, trill_per_s=120, swing_hz=270, unsteady_hz=60,
                  flutter_db=3.0, fade_s=0.011)
    wavers = sing(shaped(WAVERS, LEVEL), FAR_OVERTONES_DB, trill_per_s=110, swing_hz=90,
                  unsteady_hz=55, flutter_db=3.5, fade_s=0.0071)
    zigzags = sing(shaped(ZIGZAGS, FALL), FAR_OVERTONES_DB, trill_per_s=38, swing_hz=277, unsteady_hz=70,
                   flutter_db=4.5, fade_s=0.0032, uneven=0.12)
    purrs = sing(shaped(PURRS, LEVEL), [], trill_per_s=150, swing_hz=170, unsteady_hz=8, flutter_db=1.0,
                 fade_s=0.01, uneven=0.02)
    return whistles + purrs + buzzes + wavers + zigzags


def rustles():
    grains = rng.standard_normal(N) * linear_from_db(2.0 * drift(300))
    return bumps(RUSTLES) * rms_one(band(grains, 3300, 7600, order=4))


def knock():
    knock_s, knock_db, soft_hz = 5.559, -9.5, 2500
    t = np.maximum(TIME - knock_s, 0)
    rings = sum(linear_from_db(db - 60 * t / t60) * np.sin(2 * np.pi * hz * t) for hz, db, t60 in WOOD)
    return -linear_from_db(knock_db) * signal.sosfilt(signal.butter(2, soft_hz, fs=SR, output="sos"), rings)


def engine():
    per_s, db = in_time(ENGINE, TIME)
    turns = np.cumsum(per_s) / SR + 0.7 + 0.008 * drift(15)
    fired = np.diff(np.floor(turns), prepend=0).clip(0)
    puff_t60_s = 0.12
    puff_level = signal.lfilter([0.035], [1, -linear_from_db(-60 / (puff_t60_s * SR))], fired)
    puffs = puff_level * rng.standard_normal(N)
    gas = fired * linear_from_db(1.4 * rng.standard_normal(N)) + puffs
    pops = sum(linear_from_db(d) * band(gas, low_hz, high_hz, order=3) for low_hz, high_hz, d in EXHAUST)
    fade_in = np.clip(TIME - ENGINE[0][0], 0, 1)
    return linear_from_db(db) * fade_in * rms_one(pops)


def motor():
    return sing(held(DRONE), [], trill_per_s=0, swing_hz=0, unsteady_hz=10, flutter_db=6.5, fade_s=0.02)


def street():
    rumble_db, hiss_db = in_time(STREET, TIME)
    rumble = linear_from_db(rumble_db - 2.5 + 1.9 * drift(23.4)) * coloured(RUMBLE)
    rumble = signal.sosfilt(signal.butter(2, 48, "high", fs=SR, output="sos"), rumble)
    hiss = linear_from_db(hiss_db + 5.5 + 1.9 * drift(4.4)) * coloured(HISS)
    return rumble + hiss


def gusts():
    return bumps(GUSTS) * rms_one(band(rng.standard_normal(N), 60, 280, order=2))


def yard(x):
    t60_s, build_up_s = 0.31, 0.0037
    t = np.arange(SR // 2) / SR
    tail = rng.standard_normal(len(t)) * linear_from_db(-60 * t / t60_s) * np.clip(t / build_up_s, 0, 1)
    tail = signal.lfilter([1], [1, -0.45], tail)
    return signal.fftconvolve(x, tail / np.sqrt(np.sum(tail ** 2)))[:N]


def scene():
    near = near_bird() + close_voices() + engine()
    far = far_birds() + rustles() + knock() + motor()
    is_far = (TIME > 0.42) & (TIME < 7.97)
    far_wet_db = np.where(is_far, -5, -11)
    echoes = yard(linear_from_db(-15.5) * near + linear_from_db(far_wet_db) * far)
    return (near + far + echoes + street() + gusts())[None]


def roll_off(x):
    return signal.sosfilt(signal.butter(12, 15570, fs=SR, output="sos"), x)


def record(dry):
    loud = np.clip(dry, -1, 1)
    top_pass = signal.butter(6, 9000, "high", fs=SR, output="sos")
    body = signal.sosfilt(signal.butter(6, 9000, fs=SR, output="sos"), loud)
    top = signal.sosfilt(top_pass, loud)
    hashed = signal.sosfilt(top_pass, top * (0.44 + 0.48 * drift(550)))
    cut = signal.cheby2(12, 60, 16300, fs=SR, output="sos")
    mix = np.clip(signal.sosfilt(cut, body + hashed), -1, 1)
    return roll_off(mix)


dry = scene()
out = record(dry)
wav_out(out)
```